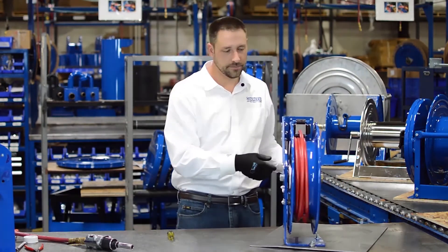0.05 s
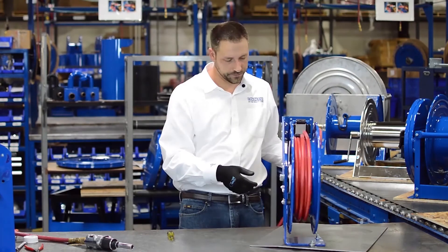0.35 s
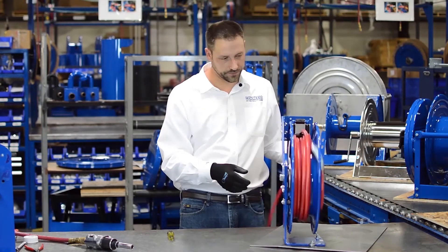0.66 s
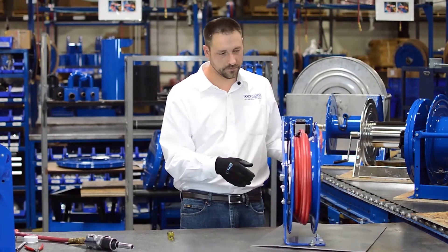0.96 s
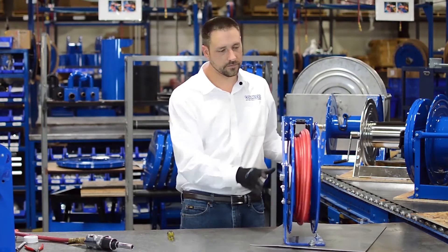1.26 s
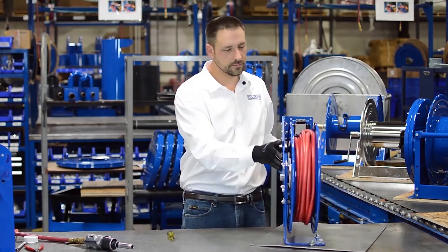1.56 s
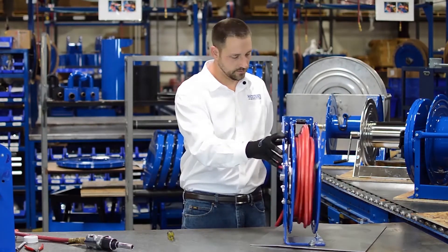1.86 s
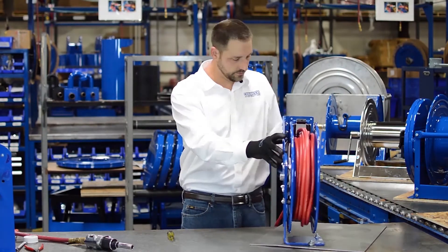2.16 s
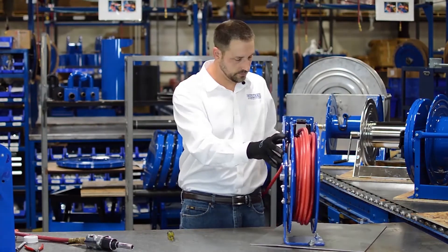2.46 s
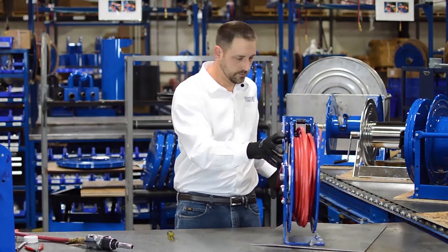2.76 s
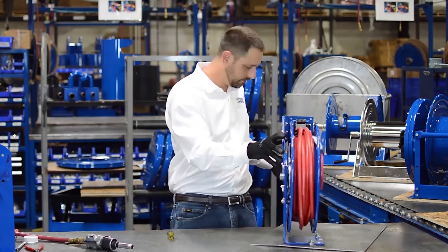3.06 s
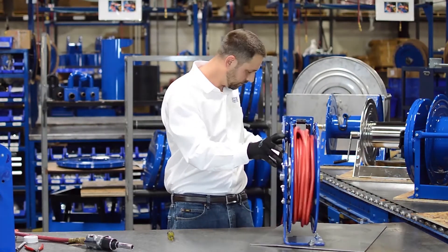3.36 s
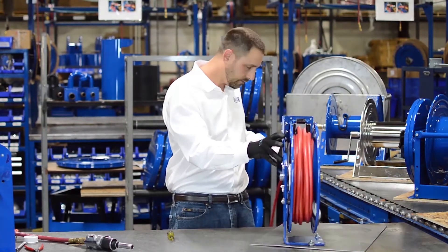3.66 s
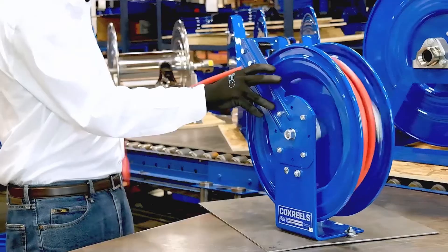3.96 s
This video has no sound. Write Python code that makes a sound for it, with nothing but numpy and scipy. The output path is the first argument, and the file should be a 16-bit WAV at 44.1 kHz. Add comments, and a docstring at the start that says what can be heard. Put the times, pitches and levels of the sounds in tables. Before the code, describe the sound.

Close by in a workshop, a metal hose reel turns with a ringing scrape and loose knocks. In a quieter gap its ratchet clicks over a faint air rumble, before it rattles again with hissing, ticking hose.

```python
"""A workshop bench, close up: a steel spring-rewind hose reel is pulled twice.
Spring and hose scrape on the drum and loose parts knock, ringing the casing and flanges.
The rubbed rim sings, the drum thumps hollowly, and the rubber hose hisses, ticks, squeaks and rustles.
Between the pulls the ratchet pawl clicks over the hall's ventilation rumble."""
import sys
import numpy as np
from scipy import signal
from scipy.fft import rfft, irfft
from scipy.io import wavfile

SR = 44100
rng = np.random.default_rng(int(sys.argv[2]) if len(sys.argv) > 2 else 0)


def transcribe(u):
    """Save the signal u as a 16-bit wav file named by the first command-line argument.

    u: samples, shape (n,) or (channels, n), limited to [-1, 1]; the rate is SR.
    q: integer samples, one column per channel.
    """
    v = np.clip(np.atleast_2d(u).T, -1, 1)
    q = np.round(v * 32767).astype(np.int16)
    wavfile.write(sys.argv[1], SR, q)


N = 176400
T = np.arange(N) / SR

# drag per pull: t/s, low/dB, mid/dB, treble/dB (before the band gains)
FIRST_DRAG = [(0.0, -23, -14, -26.5), (0.13, -25, -20.5, -26), (0.46, -23, -17.5, -23),
              (0.66, -23.5, -17, -20), (0.83, -23.5, -19, -26.5), (1.12, -26.5, -16, -26.5),
              (1.4, -25.5, -17, -26.5), (1.82, -25, -20, -27), (1.88, -25, -21, -42),
              (2.0, -25.5, -24, -36), (2.11, -33, -28.5, -45.5), (2.29, -44.5, -43, -55),
              (2.43, -40.5, -38, -51), (2.7, -35, -48, -49.5), (2.82, -32, -33, -42.5),
              (2.88, -27.5, -36, -37)]
SECOND_DRAG = [(2.88, -34, -29.5, -37), (2.93, -23.5, -30, -38), (2.975, -25, -22, -28),
               (3.0, -21.5, -19, -26), (3.11, -27, -20, -24), (3.16, -26, -23.5, -31),
               (3.235, -24.5, -23, -32), (3.29, -29.5, -26, -42), (3.39, -23.5, -23, -16),
               (3.417, -31.5, -33, -40), (3.462, -22.5, -23, -28), (3.478, -17.5, -11.5, -12.5),
               (3.515, -22.5, -21, -34), (3.59, -20, -17.5, -19), (3.65, -19, -14, -17),
               (3.685, -23.5, -21.5, -30), (3.765, -19, -18.5, -14), (3.79, -24, -21, -26),
               (3.84, -23, -21, -29), (3.89, -21.5, -19, -18), (3.96, -19, -19.5, -14),
               (4, -24.5, -19, -24)]
# reel spectrum per pull: f/Hz, level/dB
FIRST_SPECTRUM = [(250, -26), (520, -18), (680, -4), (880, -2.5), (1200, -2.5), (1600, -4), (1900, -3),
                  (2200, -14.5), (2650, -18), (3100, -8), (3480, 6), (4600, -0.5), (5700, -5), (6800, -10),
                  (8300, -8), (10000, -15), (11200, -22), (14500, -22), (16000, -46)]
SECOND_SPECTRUM = [(250, -26), (500, -16), (680, -4.5), (1000, -0.5), (1550, -0.5), (2150, -1),
                   (2550, -7.5), (3200, 2), (3800, 10), (5300, -0.5), (6400, 2.5), (7300, -3), (8200, -4),
                   (9300, -14), (11500, -20.5), (14000, -17), (16000, -36)]
FIRST_GAINS_DB, SECOND_GAINS_DB = (0.5, -3.5, 1), (-0.5, -3, -5.5)
SECOND_PULL_S = 2.88


def reel():
    """Scraping and knocks drive the steel; the drag also stirs the drum and makes the rim sing."""
    second = T >= SECOND_PULL_S
    drag = np.where(second, drag_bands(SECOND_DRAG, SECOND_GAINS_DB),
                    drag_bands(FIRST_DRAG, FIRST_GAINS_DB))
    scrape = scraping(drag)
    blows = knocks()
    out = drum_drag(drag[0]) + rim(drag[1])
    for pull, spectrum in ((~second, FIRST_SPECTRUM), (second, SECOND_SPECTRUM)):
        out += steel(scrape * pull, spectrum, flange_db=-11, case_db=-0.95, case_t60_s=0.048, spots=3)
        out += steel(blows * pull, spectrum, flange_db=-8.5, case_db=-1, case_t60_s=0.036, spots=2)
    return out


def drag_bands(table, gains_db):
    """Drag amplitude in the low, mid and treble bands."""
    times, *levels = np.array(table).T
    return np.array([amp(np.interp(T, times, db) + gain) for db, gain in zip(levels, gains_db)])


FLUTTER_DB, FLUTTER_PER_S = 1.17, 140


def scraping(drag, crackle_per_s=60, crackle_db=-8.5, crackle_fall_s=0.00084):
    """Friction force: dense grains, with brief spikes of grip above the steady drag."""
    friction = drag * grains(per_s=5000, spread_db=3.5)
    spikes = through(grains(crackle_per_s, spread_db=3.5) ** 2, np.exp(-T[:512] / crackle_fall_s))
    power = 1 + amp(crackle_db) ** 2 * spikes / spikes.mean()
    crackle = np.sqrt(power / power.mean())
    return friction * crackle * amp(FLUTTER_DB * wander(FLUTTER_PER_S))


# loose-part knocks: t/s, mid/dB, low/dB, treble/dB (before the band gains)
KNOCK_HITS = [(0.029, -7, -22, -20), (0.08, -3, -22, -11), (0.138, -11, -29, -18.5),
              (0.2299, 1, -15.5, -12), (0.2472, -17, -20, -11), (0.269, -10, -21, -14.5),
              (0.2834, -12, -17.5, -18), (0.3675, -5, -9.5, -12), (0.3855, -8, -13.5, -18),
              (0.405, -16, -28, -16), (0.48, -19, -31, -15.5), (0.504, -8, -15, -11.5),
              (0.524, -17, -22.5, -14), (0.5386, -14, -25, -17), (0.549, -14, -21, -17),
              (0.561, -12, -22, -19.5), (0.6453, -14, -13, -12.5), (0.6666, -6, -16.5, -18),
              (0.7852, -16, -14.5, -9.5), (0.8045, -10, -27, -11.5), (0.828, -5, -17, -13.5),
              (0.8646, -19, -17, -19), (0.9573, 0, -14, -13), (1.0107, 3, -18.5, -17.5),
              (1.0236, -3, -25, -21), (1.138, 4.5, -22, -12), (1.1608, -7, -23, -20),
              (1.1894, -1, -18.5, -22), (1.3115, 3, -21, -15), (1.4162, 2.5, -49, -39),
              (1.471, 2, -33, -18), (1.4904, -11, -19, -15.5), (1.515, -12, -13, -14),
              (1.6774, -2, -13.5, -12.5), (1.7527, -2, -20, -19.5), (1.7926, -5, -41, -23),
              (1.856, 1, -20, -19.5), (1.872, -3, -36, -23), (1.897, -21, -15, -13),
              (1.935, -3.5, -18.5, -18), (2.0994, -6, -21, -35), (2.121, -6, -29, -40),
              (2.257, -11, -28, -58), (2.787, -12.5, -24, -35.5), (2.982, -4, -15.5, -22),
              (3.024, -3, -19, -25), (3.08, -8, -15.5, -20.5), (3.1006, 3.5, -17.5, -19),
              (3.131, -14, -41, -21), (3.269, 0.5, -14, -13), (3.304, -4, -19, -16),
              (3.324, -1, -16.5, -18.5), (3.3575, -11, -16.5, -21), (3.4928, -4, -15, -11.5),
              (3.5217, 2, -14.5, -16.5), (3.553, 1, -13.5, -13), (3.698, -9, -22, -14),
              (3.7232, -3, -17, -16), (3.7525, 7, -28, -15), (3.8809, 2, -14.5, -14), (3.906, 2, -18, -22),
              (3.9356, 3, -21, -29), (3.949, -5, -27, -20)]
KNOCK_GAINS_DB = (-2.5, -17.5, 1.5)  # low, mid, treble


def knocks():
    """Force of loose parts: a brief chatter of contacts, then a weaker rattle."""
    power = np.zeros((3, N))
    for start, mid, low, treble in KNOCK_HITS:
        chatter = burst(start, hold_s=0.0031, fall_s=0.0042)
        rattle = 0.29 * burst(start, hold_s=0, fall_s=0.044)
        envelope = (chatter + rattle) * attack(start, rise_s=0.0017)
        gains = amp(np.array([low, mid, treble]) + KNOCK_GAINS_DB)
        power += (gains[:, None] * envelope) ** 2
    return np.sqrt(power) * grains(per_s=9000, spread_db=3.5)


# steel flange modes: f/Hz, level/dB, t60/s
FLANGE_MODES = [(894, -0.5, 0.037), (1022, -2, 0.067), (1505, -1, 0.049), (3543, -4, 0.026),
                (3780, -10.5, 0.021), (4515, -6, 0.16), (4530, -20, 0.36), (5170, -9, 0.34),
                (5730, 3.5, 0.017), (5800, -3, 0.16), (5800, -10, 0.062), (6040, -7, 0.058),
                (7840, -6, 0.23), (7730, -5, 0.15)]
LOW_EDGE_HZ, HIGH_EDGE_HZ = 2476, 5510


def steel(forces, spectrum, flange_db, case_db, case_t60_s, spots):
    """Three force bands ring casing and flanges; the contact roams over spots that each ring differently."""
    case_decay = decay(case_t60_s)
    tint = colour(spectrum)
    flange = amp(flange_db) * ring(FLANGE_MODES)
    bands = [(LOW_EDGE_HZ, "low"), ([LOW_EDGE_HZ, HIGH_EDGE_HZ], "band"), (HIGH_EDGE_HZ, "high")]
    filters = [signal.butter(4, edge, kind, fs=SR, output="sos") for edge, kind in bands]
    contact = np.argmax([wander(per_s=14) for _ in range(spots)], axis=0)
    out = np.zeros(N)
    for spot in range(spots):
        body = flange + amp(case_db) * unit(case_decay * rng.standard_normal(len(case_decay)))
        body[0] += 1  # direct sound
        body = signal.fftconvolve(body, tint)
        for force, sos in zip(forces, filters):
            out += through(force * (contact == spot), unit(signal.sosfilt(sos, body)))
    return out


# rim modes: f/Hz, level/dB, t60/s
RIM_MODES = [(3436, -4, 0.063), (3533, 3, 0.054), (3690, -1, 0.096), (4170, -8, 0.043), (4520, 1.5, 0.049),
             (4730, -4, 0.076), (5090, -3, .09)]
# rim drive: t/s, level/dB re drag
RIM_DRIVE = [(0, -9), (.3, -10), (.9, -10), (1.05, 0), (1.43, -3.5), (1.478, 8.5), (1.505, -7), (1.62, 0),
             (1.75, -19), (2.6, -24), (4, -23)]


def rim(drag, swell_db=3, waver_s=0.00023):
    """The rubbed rim sings, swelling and wavering in pitch as the hose shifts on it."""
    level = amp(curve(RIM_DRIVE) + swell_db * wander(per_s=30))
    song = through(drag * level * grains(per_s=810, spread_db=3.5), ring(RIM_MODES))
    return np.interp(T + waver_s * wander(per_s=30), T, song)


# ringing parts: t/s, f/Hz, level/dB, t60/s
STEEL_PINGS = [(.231, 5760, -14, 0.15), (.37, 890, -17, 0.096), (.649, 940, -16.5, 0.11),
               (.792, 888, -17.5, 0.09), (2.347, 800, -19, 0.11), (.807, 5740, -19, .07),
               (1.138, 5910, -15, .08), (1.163, 5730, -12, .07), (1.492, 5750, -12, 0.11),
               (1.68, 7800, -16, 0.11), (1.757, 7900, -17, 0.058), (1.9, 7920, -8.5, 0.058),
               (2.915, 1056, -13, 0.1), (2.916, 5750, -14, 0.055), (2.916, 8500, -21, 0.049),
               (2.984, 7890, -12, 0.069), (3.271, 1022, -16, 0.26), (3.304, 1058, -18.5, 0.25),
               (3.101, 1570, -16.5, 0.067), (3.7, 1027, -13, 0.071)]


def pings():
    """Single steel modes ring on after hard blows."""
    return sum(amp(db) * burst(start, 0, t60 / np.log(1000)) * np.sin(2 * np.pi * hz * (T - start))
               for start, hz, db, t60 in STEEL_PINGS)


# hollow drum modes, lower pair then upper pair: f/Hz, level/dB, t60/s
DRUM_MODES = [(326.3, -5.5, 0.24), (351, 6, 0.053), (521, 4, 0.034), (647.6, 6.5, 0.035)]
# shoves on the drum: t/s, level/dB, hold/s, upper pair offset/dB
DRUM_SHOVES = [(0.16, -40.5, 0.071, -11), (0.22, -39, 0.034, -17), (0.448, -35, 0.012, -13),
               (0.503, -36, 0.037, -17), (0.638, -48, 0.036, 6), (0.791, -27, 0.009, -9),
               (0.882, -33.5, 0.044, -12), (1.125, -26.5, 0.0085, -9), (1.199, -35, 0.047, -10.5),
               (1.446, -33.5, 0.052, -8.5), (1.516, -32, 0.055, -7.5), (1.644, -36, 0.05, -20),
               (1.821, -31, 0.027, -14), (2.985, -28.5, 0.029, -1), (3.006, -22, 0.023, -6.5),
               (3.065, -27, 0.057, -7.5), (3.6, -29, 0.049, -10), (3.665, -34.5, 0.034, -6),
               (3.876, -32.5, 0.014, -11)]


def thumps(wobble_rad=1.23):
    """Soft shoves of the hose swell the drum's modes, which wobble in pitch."""
    lower, upper = sum(
        amp([[db], [db + upper_db]]) * burst(start, hold, fall_s=0.0084) * attack(start, rise_s=0.0079)
        for start, db, hold, upper_db in DRUM_SHOVES)
    tones = [amp(db) * np.sin(2 * np.pi * hz * T + wobble_rad * wander(per_s=70))
             for hz, db, _ in DRUM_MODES]
    roughness = 1 + 0.43 * wander(per_s=200)
    return (lower * sum(tones[:2]) + upper * sum(tones[2:])) * roughness


def drum_drag(drag, gain_db=-17):
    """Friction noise stirs the drum's two lowest modes."""
    return amp(gain_db) * through(drag * rng.standard_normal(N), ring(DRUM_MODES[:2]))


# pawl drops: t/s, level/dB, chatter/s, fall/s, low offset/dB, treble offset/dB
PAWL_DROPS = [(2.003, -20.5, .002, .004, -4, 1), (2.0107, -16, .002, 0.0057, 0, -0.5),
              (2.023, -16.5, 0.0063, 0.0055, -4.5, -10), (2.336, -28.5, .0043, 0.0056, 1, -16),
              (2.3468, -20, 0.005, 0.0074, -8, -12), (2.36, -26, 0.0094, 0.011, -2, -6),
              (2.6788, -15, 0.0029, 0.012, -3, -5), (2.9112, -18.5, .002, .003, 2, 1),
              (2.9168, -14.5, 0.0028, 0.0017, -0.5, 1)]
# pawl spectrum: f/Hz, level/dB
PAWL_SPECTRUM = [(300, -13), (900, 1), (1600, 10.5), (2500, -8.5), (3500, 10.5), (6000, 1.5), (7200, -0.5),
                 (10000, -8), (15500, -14)]


def pawl():
    """The pawl snaps onto a ratchet tooth and chatters there."""
    envelope = sum(amp([[db + low], [db], [db + treble]]) * burst(start, hold, fall)
                   for start, db, hold, fall, low, treble in PAWL_DROPS)
    force = envelope * grains(per_s=5000, spread_db=2.5)
    return steel(force, PAWL_SPECTRUM, flange_db=-9, case_db=-1, case_t60_s=0.023, spots=2)


# hose hiss spectrum: f/Hz, level/dB
SLIDE_SPECTRUM = [(5000, -30), (8000, 1), (9500, 1.5), (11500, -0.5), (14000, -6), (16000, -21)]
# hose hiss envelope: t/s, level/dB
SLIDE_ENVELOPE = [(2.88, -45), (3.0, -41.5), (3.4, -51), (3.46, -44), (3.475, -27), (3.515, -42),
                  (3.555, -27), (3.58, -32), (3.645, -29), (3.69, -39), (3.77, -31), (3.83, -39.5),
                  (3.89, -28), (4, -38)]


def slide():
    """Rubber slides through the guide with a gritty hiss in the second pull."""
    level = amp(curve(SLIDE_ENVELOPE) + FLUTTER_DB * wander(FLUTTER_PER_S)) * (T >= SECOND_PULL_S)
    return through(level * grains(per_s=3600, spread_db=5.0), colour(SLIDE_SPECTRUM))


# hose releases: t/s, level/dB, centre f/Hz
HOSE_TICKS = [(1.06, -9, 4400), (1.254, -20, 5870), (1.293, -27, 4970), (2.632, -34, 9500),
              (3.054, -9, 5900), (3.114, -7, 5700), (3.271, -8, 6550), (3.336, -8.5, 6100),
              (3.369, -18, 6460), (3.381, -9, 6230), (3.542, -10, 5500), (3.571, -12, 5800),
              (3.743, -13, 5900), (3.764, -12, 7600)]


def ticks(relative_width=0.26):
    """The hose sticks and lets go with a dry, band-limited tick."""
    out = np.zeros(N)
    contacts = grains(per_s=19000, spread_db=0.5)
    for start, db, hz in HOSE_TICKS:
        resonance = np.exp(-np.pi * relative_width * hz * T[:256]) * np.sin(2 * np.pi * hz * T[:256])
        band = unit(np.convolve(resonance, np.diff(resonance)))
        out += amp(db) * through(contacts * burst(start, hold_s=0.00098, fall_s=0.0028), band)
    return out


def squeaks(per_s=85, until_s=2.3, centre_hz=8930, width_s=0.00085, draws=400):
    """Rubber slips in tiny gliding chirps that follow the first pull's treble drag."""
    out = np.zeros(N + 512)
    t = (np.arange(512) - 256) / SR
    starts = np.cumsum(rng.exponential(1, draws) / per_s)
    for start, (pitch, size, glide) in zip(starts, rng.standard_normal((draws, 3))):
        if start < until_s:
            hz = centre_hz * np.exp(0.071 * pitch)
            phase = 2 * np.pi * hz * t * (1 + 0.06 * glide * t / (4 * width_s))
            envelope = amp(0.5 + 4.6 * size) * np.exp(-(t / width_s) ** 2)
            first = int(start * SR)
            out[first:first + len(t)] += envelope * np.sin(phase)
    return out[:N] * drag_bands(FIRST_DRAG, FIRST_GAINS_DB)[2]


# hose shifts: t/s, level/dB, hold/s
HOSE_SHIFTS = [(2.159, -25.5, 0.0045), (2.182, -35, .008), (2.2318, -24, 0.003), (2.253, -30, .007),
               (2.436, -31, 0.0061), (2.476, -38, .006), (2.485, -30, 0.0066), (2.606, -34, .005),
               (2.619, -33, .006), (2.628, -31.5, 0.011), (2.739, -29, 0.031), (2.798, -32, .005),
               (2.86, -28, 0.0081), (3.206, -27, 0.0059)]
# rustle spectrum: f/Hz, level/dB
RUSTLE_SPECTRUM = [(1000, -25), (2600, -7.5), (3500, 0), (5200, 0), (6500, -19), (10000, -24), (16000, -30)]


def rustles(flange_db=-9):
    """The hose shifts on the drum in soft rubs that faintly ring the flanges."""
    level = sum(amp(db) * burst(start, hold, fall_s=0.0035) * attack(start, rise_s=0.002)
                for start, db, hold in HOSE_SHIFTS)
    body = amp(flange_db) * ring(FLANGE_MODES)
    body[0] += 1  # direct sound
    body = unit(signal.fftconvolve(body, colour(RUSTLE_SPECTRUM)))
    return through(level * rng.standard_normal(N), body)


# room rumble spectrum: f/Hz, level/dB
RUMBLE_SPECTRUM = [(18, -17), (30, -7), (55, 2), (85, 0), (125, -3), (200, -7.5), (330, -4), (480, -8),
                   (850, -6.5), (1200, -22.5), (2400, -21.5), (5000, -27), (9000, -36.5), (16000, -43)]
# recorder gain on the room rumble: t/s, level/dB
RUMBLE_GAIN = [(0, -43.5), (.55, -42.5), (.65, -36.5), (.9, -39.5), (1.6, -42), (2.0, -31.5), (2.25, -31),
               (2.65, -30), (2.95, -29), (3.15, -35), (3.5, -40.5), (4, -36)]


def room_rumble(drift_db=1.2):
    """Ventilation noise; a set gain curve ducks it under the reel and brings it up in the pause."""
    air = through(rng.standard_normal(N), colour(RUMBLE_SPECTRUM, size=8192))
    return air * amp(curve(RUMBLE_GAIN) + drift_db * wander(per_s=7.38))


def amp(db):
    return 10 ** (np.asarray(db) / 20)


def unit(x):
    """Scale to unit energy."""
    return x / np.sqrt(np.sum(x ** 2))


def through(x, response):
    return signal.oaconvolve(x, response)[:N]


def curve(points):
    return np.interp(T, *np.array(points).T)


def colour(spectrum, size=2048):
    """Minimum-phase response with the given spectrum."""
    hz, db = np.array(spectrum).T
    f = np.maximum(np.fft.rfftfreq(size, 1 / SR), 1)
    magnitude = amp(np.interp(np.log(f), np.log(hz), db))
    cepstrum = irfft(np.log(magnitude))
    cepstrum[1:size // 2] *= 2
    cepstrum[size // 2 + 1:] = 0
    return unit(irfft(np.exp(rfft(cepstrum))))


def decay(t60_s):
    """Exponential decay, 0.25 s long."""
    return np.exp(-np.log(1000) * T[:SR // 4] / t60_s)


def ring(modes):
    """Sum of decaying modes."""
    t = T[:SR // 4]
    return unit(sum(amp(db) * unit(decay(t60) * np.cos(2 * np.pi * hz * t)) for hz, db, t60 in modes))


def wander(per_s):
    """Random drift, standard deviation 1."""
    points = rng.standard_normal(4096)
    drift = np.interp(T * per_s, np.arange(len(points)), points)
    return drift / drift.std()


def grains(per_s, spread_db):
    """Tiny contacts of uneven size, rms 1."""
    impulses = (rng.random(N) < per_s / SR) * np.sign(rng.standard_normal(N))
    impulses *= amp(spread_db * np.clip(rng.standard_normal(N), -2, 2))
    return impulses / impulses.std()


def attack(start_s, rise_s):
    return np.clip((T - start_s) / rise_s, 0, 1)


def burst(start_s, hold_s, fall_s):
    """Instant onset, hold, exponential release."""
    out = np.zeros(N)
    span = slice(int(start_s * SR), int((start_s + hold_s + 10 * fall_s) * SR))
    out[span] = np.exp(-np.maximum(T[span] - start_s - hold_s, 0) / fall_s)
    return out


def scene():
    """Mono mix."""
    mix = reel() + slide() + ticks() + rustles() + pings() + squeaks() + pawl() + thumps()
    return (mix + room_rumble())[None]


def record(dry, top_hz=16000):
    """Soft peak limiting, then a steep low-pass."""
    rounded = dry / (1 + dry ** 8) ** .125
    return signal.sosfilt(signal.ellip(10, .2, 70, top_hz, fs=SR, output="sos"), rounded)


dry = scene()
out = record(dry)
transcribe(out)
```